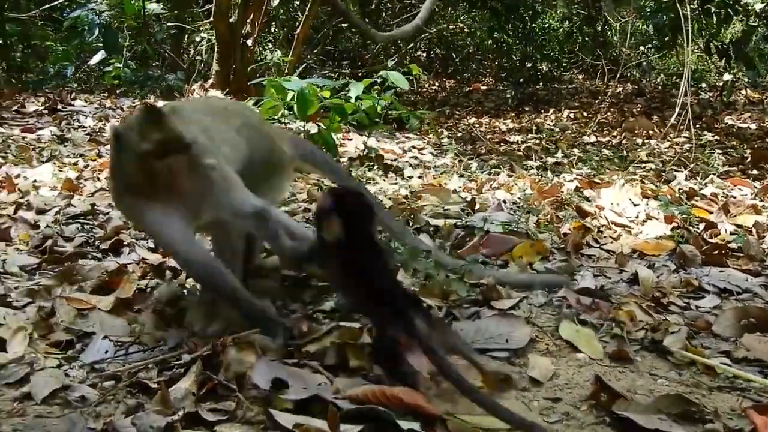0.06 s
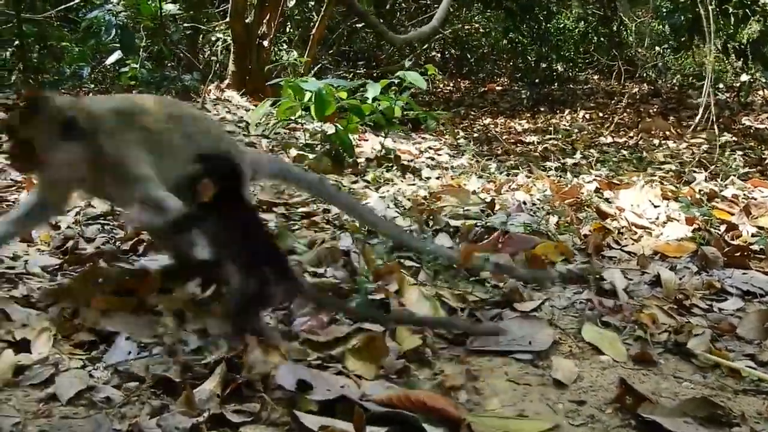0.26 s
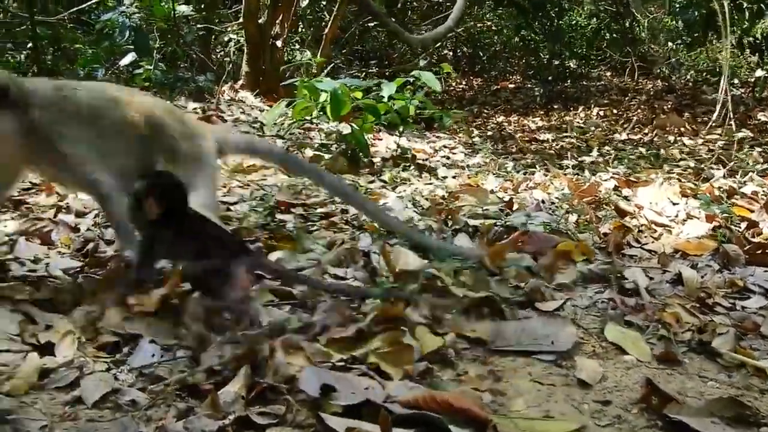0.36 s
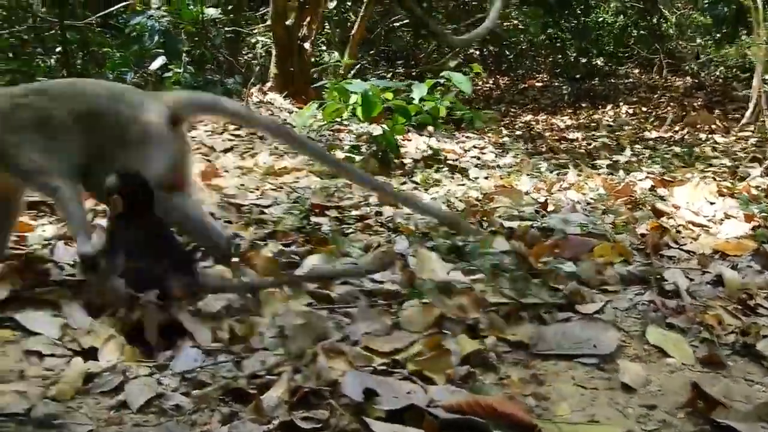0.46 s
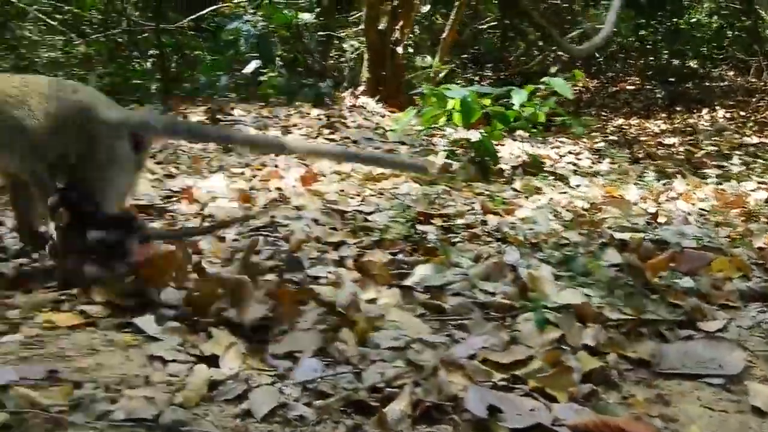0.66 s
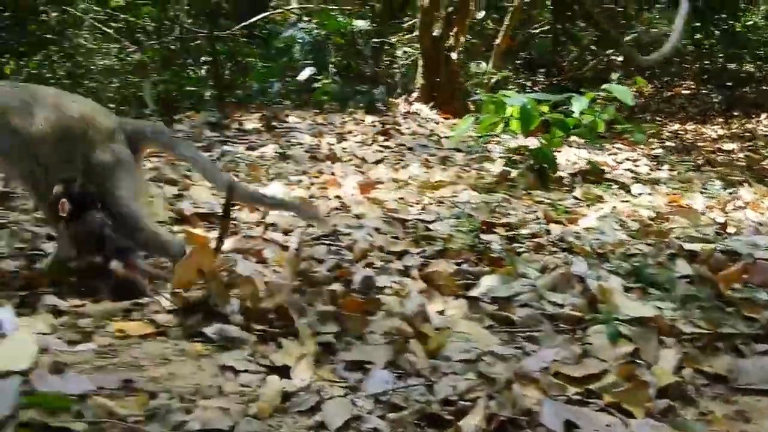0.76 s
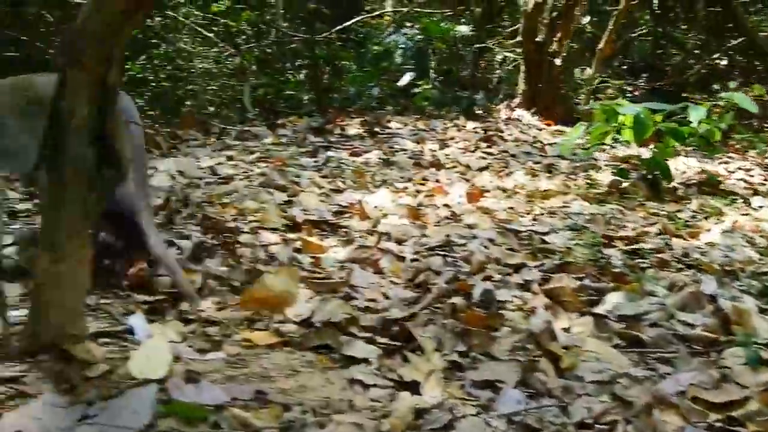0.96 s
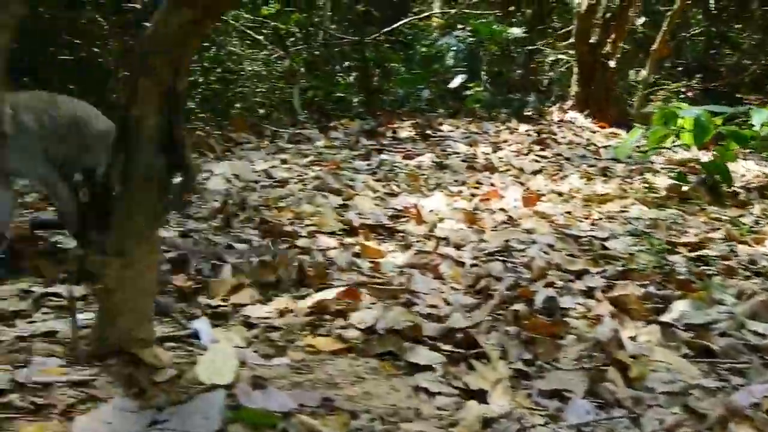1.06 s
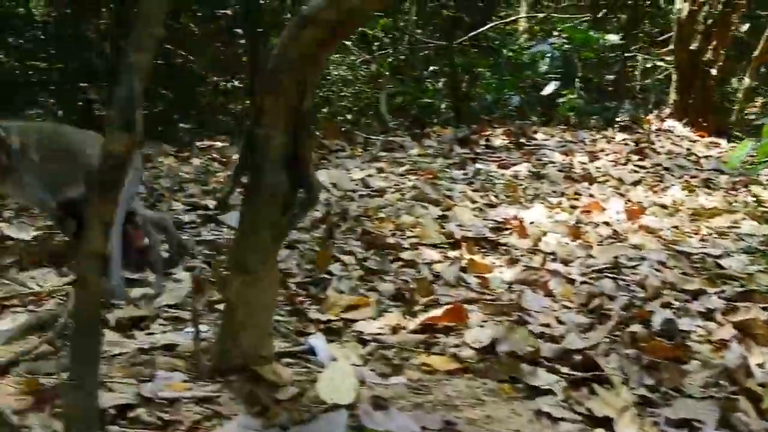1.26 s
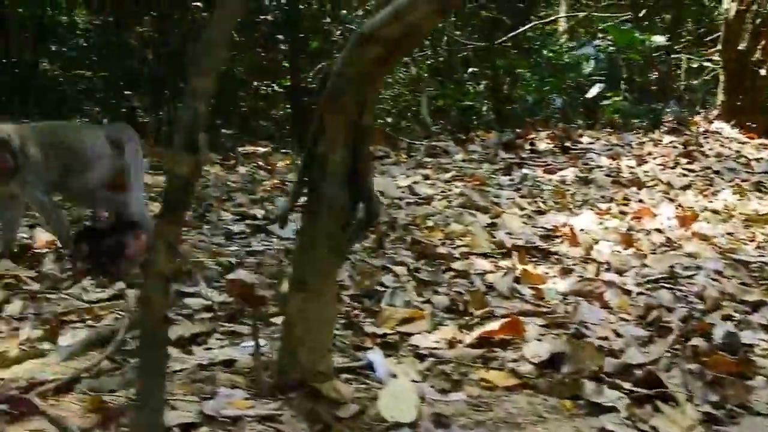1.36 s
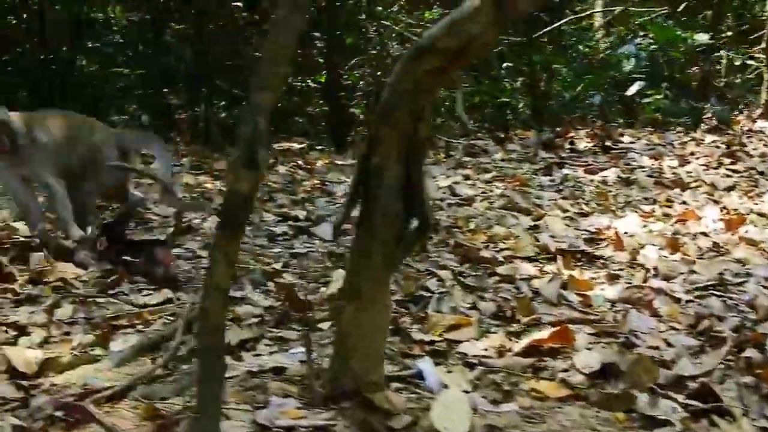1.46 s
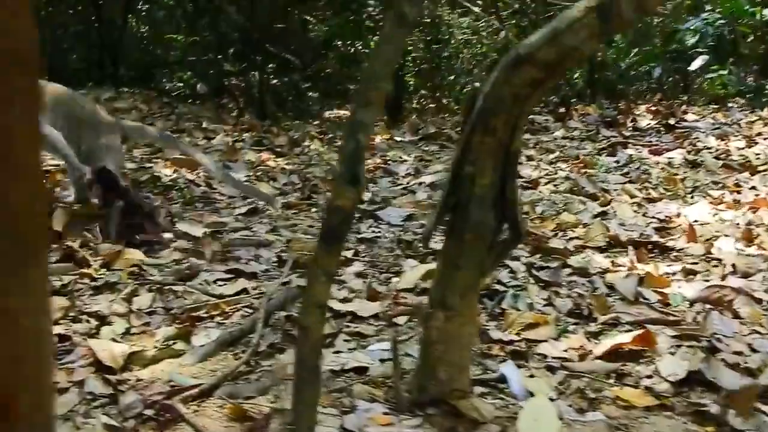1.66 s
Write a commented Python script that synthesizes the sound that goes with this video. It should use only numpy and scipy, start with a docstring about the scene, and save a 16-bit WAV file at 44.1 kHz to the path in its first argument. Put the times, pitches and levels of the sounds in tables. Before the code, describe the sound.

A baby monkey gives four short, shrill, raspy squeals with faint whimpers between, close and slightly left. Monkey feet crunch through dry leaves throughout, over soft forest hiss, faint insects and a low distant rumble.

```python
"""Baby monkey on the forest floor

Close by, a little left of a stereo pair, a baby monkey squeals four times, whimpering faintly between,
as it clings to an adult walking off over dry leaves. Each squeal is a gliding whistle, modulated by a
second, lower oscillator and torn by rasp. Behind the crunching feet lie a low distant rumble, forest
hiss and faint insects; the recorder's gain control ducks after the loud squeals."""
import sys
import numpy as np
from scipy import signal
from scipy.fft import rfft, irfft
from scipy.io import wavfile
from scipy.ndimage import uniform_filter1d

SR = 44100
rng = np.random.default_rng(int(sys.argv[2]) if len(sys.argv) > 2 else 0)


def transcribe(u):
    """Save the signal u as a 16-bit wav file named by the first command-line argument.

    u: samples, shape (n,) or (channels, n), limited to [-1, 1]; the rate is SR.
    q: integer samples, one column per channel.
    """
    v = np.clip(np.atleast_2d(u).T, -1, 1)
    q = np.round(v * 32767).astype(np.int16)
    wavfile.write(sys.argv[1], SR, q)


N = 74970
T = np.arange(N) / SR
HZ = np.fft.rfftfreq(N, 1 / SR)


def amp(db):
    """Decibels to gain."""
    return 10 ** (np.asarray(db) / 20)


def unit(x):
    """Scales to rms 1."""
    return x / np.sqrt(np.mean(x ** 2) + 1e-20)


def curve(points):
    """Interpolates a table over log frequency onto the FFT bins."""
    f, value = np.transpose(points)
    return np.interp(np.log(HZ + 1), np.log(f), value)


def colour(x, spectrum):
    """Filters by a spectrum table; rms 1."""
    return unit(irfft(rfft(x) * amp(curve(spectrum)), N))


def wander(rate_hz):
    """Random motion up to about the given rate; rms 1."""
    return unit(irfft(rfft(rng.standard_normal(N)) / (1 + (HZ / rate_hz) ** 4), N))


def noise_band(phase, width_hz):
    """A band of noise centred on a tone."""
    return wander(width_hz) * np.sin(phase) + wander(width_hz) * np.cos(phase)


def mic_pair(x):
    """Blends two unrelated signals into left and right, least alike in the treble."""
    # likeness of the two microphones: f/Hz, coherence
    coherence = [(30, 0.7), (150, 0.97), (300, 0.91), (600, 0.74), (2000, 0.78), (8000, 0.45),
                 (15000, 0.27)]
    alike = np.clip(curve(coherence), 0, 1)
    mid, side = rfft(x) * np.sqrt([(1 + alike) / 2, (1 - alike) / 2])
    return irfft(np.array([mid + side, mid - side]), N)


def stereo_noise(spectrum):
    """Coloured noise at the two microphones; rms 1."""
    return colour(mic_pair(rng.standard_normal((2, N))), spectrum)


def distant_rumble():
    """Low noise from far off that swells and sinks."""
    # colour of the rumble: f/Hz, relative density/dB
    spectrum = [(20, -43), (50, -25.5), (80, -3.5), (125, -14), (160, 2.5), (205, -1), (245, 0), (310, -9),
                (380, -17), (700, -24.5), (2000, -64)]
    # swell of the rumble: t/s, level/dB
    swell = [(0, -30.5), (.065, -32), (.11, -35), (.23, -33), (.39, -37), (.47, -31.5), (.8, -35),
             (.89, -32.5), (.95, -36.5), (1.015, -33), (1.1, -35.5), (1.3, -37.5), (1.55, -37), (1.7, -35)]
    return amp(np.interp(T, *np.transpose(swell))) * stereo_noise(spectrum)


def forest_air(level_db=-34.5, flicker_db=1.5):
    """A broad hiss all around, its level flickering slightly."""
    # colour of the forest air: f/Hz, relative density/dB
    spectrum = [(200, -10.5), (450, -2.5), (800, -1), (1500, -5.5), (2800, -7.5), (4500, -4.5), (9000, -6),
                (16000, -25)]
    return amp(level_db + flicker_db * wander(20)) * stereo_noise(spectrum)


def insects():
    """Far insects hold thin, narrow-band drones in the centre of the image."""
    # drones: f/Hz, width/Hz, level/dB
    drones = [(1774, 57, -53), (3460, 88, -49.5), (3607, 33, -56)]
    return sum(amp(db) * noise_band(2 * np.pi * hz * T, width) for hz, width, db in drones)


def leaf_litter(floor_db=-43, cracks_per_s=4000, spread_db=-.5, snap_decay_s=.0013):
    """Dry leaves underfoot: dense tiny cracks that swell with each step, and a few sharp snaps."""
    # scuffs of the feet: peak t/s, rise/s, decay/s, level/dB
    steps = [(.01, 0.013, 0.15, -30), (0.171, .04, 0.14, -29.5), (0.218, 0.019, 0.032, -28),
             (.458, 0.07, 0.052, -22), (.65, 0.085, 0.098, -22.5), (.8, 0.033, .03, -42.5),
             (.9, .02, 0.032, -32.5), (1.12, 0.084, 0.13, -25), (1.335, 0.027, 0.029, -31),
             (1.387, 0.0053, 0.062, -27), (1.436, 0.018, 0.013, -25.5), (1.535, 0.019, 0.12, -32.5),
             (1.68, 0.085, 0.036, -34)]
    # single leaves snapping: t/s, level/dB
    snaps = [(.067, -19), (0.2042, -25), (0.2207, -15.5), (.686, -9.5), (1.44, -21), (1.529, -29)]
    # colour of dry leaves: f/Hz, relative density/dB
    spectrum = [(150, -3), (600, -6), (1450, -2), (1750, 1), (2100, -3.5), (2800, -3), (3450, -0.5),
                (4100, -2), (5500, 2), (7200, 1), (9200, 9.5), (11000, -7.5), (13500, -9.5), (16000, -14.5)]
    sizes = amp(spread_db * np.minimum(rng.exponential(1, (2, N)), 4))
    cracks = rng.standard_normal((2, N)) * sizes * (rng.random((2, N)) < cracks_per_s / SR)
    power = amp(floor_db) ** 2
    for at, rise, decay, db in steps:
        scuff = amp(db) * np.exp(-np.maximum((at - T) / rise, (T - at) / decay))
        power = power + scuff ** 2
    crunch = colour(mic_pair(cracks), spectrum) * np.sqrt(power)
    snap_envelope = sum(amp(db) * (T >= at) * np.exp(-abs(T - at) / snap_decay_s) for at, db in snaps)
    return crunch + snap_envelope * stereo_noise(spectrum)


def whistle(phase, hz, level_db, sidebands_db, flutter_hz, lower_hz=3900):
    """The tone of a cry: a second, lower oscillator modulates it and puts sidebands around it."""
    lower = 2 * np.pi * np.cumsum(lower_hz * (1 + .012 * wander(flutter_hz))) / SR
    sidebands = amp(sidebands_db) @ np.sin([phase - lower, phase + lower, phase - 2 * lower])
    # the sidebands fade faster than the whistle itself
    depth = amp(.2 * (level_db - level_db.max())) * (1 + .083 * wander(flutter_hz))
    # an overtone grows as the pitch drops below 6 kHz
    octave = amp(5) * np.clip((6000 - hz) / 3400, 0, 1) * np.sin(2 * phase)
    shimmer = 1 + .28 * wander(flutter_hz)
    tone = np.sqrt(2) * (np.sin(phase) + octave + sidebands * depth) * shimmer
    # trims the deep thump as the lowest sideband sweeps down toward 0 Hz
    bass_rolloff = signal.butter(1, 35, "high", fs=SR)
    return amp(level_db) * signal.lfilter(*bass_rolloff, tone)


def rasp(phase, skirt_db):
    """The noise of a cry, in bursts: broad hiss and a skirt that clings to the whistle; rms 1."""
    # colour of the rasp: f/Hz, relative density/dB
    spectrum = [(200, -7.5), (900, -9), (2500, -6), (4000, -5.5), (5400, 2), (7200, -0.5), (9300, 3),
                (11200, -7.5), (13800, -10), (16000, -7)]
    skirt = amp(skirt_db) * noise_band(phase, width_hz=900)
    noise = stereo_noise(spectrum) + skirt
    return unit(noise * (1 + .3 * wander(rate_hz=200)))


def baby_monkey(edge_s=.002, flutter_hz=400):
    """Squeals and whimpers: each a jittery, gliding whistle with rasp that opens and closes abruptly."""
    # cries: jitter/share of pitch, skirt/dB, sidebands (below, above, far below)/dB,
    # left minus right/dB, course [t/s, pitch/Hz, whistle/dB, rasp/dB]
    cries = [ (.011, -6, (-10.5, -15, -16.5), -.3, [(.2425, 9870, 4.5, -8), (.245, 9590, -4.5, -12),
             (.251, 9416, -5, -14.5), (.261, 9350, -3.5, -11), (.27, 8830, -3, -6), (.275, 8300, -9, -17),
             (.279, 7930, -3, -16), (.286, 7850, -4, -16), (.29, 7850, -13, -19), (.302, 7780, -24, -19)]),
             (0.0164, -14, (-24, -22, -30), 0, [(.303, 7420, -26, -15.5), (.317, 6620, -16.5, -25),
             (.333, 5280, -32.5, -19), (.36, 5020, -26, -25), (.374, 4700, -31, -17.5),
             (.388, 4260, -26, -28)]), (0.0192, -9, (-29, -24, -28), 0, [(.38, 3700, -44.5, -42),
             (.398, 3170, -31, -26), (.408, 3030, -43, -32)]), (0.012, -9, (-29, -24, -28),
             0.34, [(.548, 2392, -49, -35), (.569, 3050, -36, -18.5), (.575, 3497, -21.5, -36),
             (.587, 3440, -31.5, -14.5), (.612, 3380, -38, -43)]), (.019, -1, (-15, -14, -28),
             1.2, [(.573, 8300, -25, -17), (.578, 8650, -10, -13), (.585, 10120, -18, -12.5),
             (.599, 10660, -12.5, -16), (.614, 9850, -18, -16.5), (.643, 9340, -29, -14),
             (.668, 8890, -41, -19), (.69, 8730, -44, -23), (.706, 8040, -40, -25)]),
             (0.019, 5, (-9.5, -20, -17), -1.8, [(.708, 7980, -23, -33.5), (.716, 7570, -19, -24),
             (.721, 7370, -32, -18.5), (.729, 8020, -26, -46), (.736, 7570, -32, -35)]),
             (0.0227, 3, (-25, -27, -28), -0.56, [(.737, 4450, -39, -27), (.749, 4240, -34, -32),
             (.757, 3800, -29, -32.5), (.773, 3570, -47, -37)]), (0.0898, -28, (-8, -15, -30),
             -0.56, [(1.01, 2430, -48, -33.5), (1.021, 2776, -32, -23), (1.028, 2728, -26, -25),
             (1.036, 2770, -19, -13)]), (.007, -6, (-15, -19, -20), 2, [(1.027, 8400, -16, -23),
             (1.03, 8750, -1, -15), (1.034, 9000, 1, -11), (1.038, 9380, 4, -8), (1.046, 9200, 8, -14),
             (1.051, 8950, -2.5, -3.5), (1.062, 8460, -12.5, -15), (1.076, 8050, -9.5, -16),
             (1.092, 8430, -21, -25), (1.125, 8100, -30, -27)]), (0.0102, 2, (-11.5, -16, -18),
             -1.4, [(1.571, 7394, -24.5, -38), (1.575, 7570, -22, -33), (1.582, 7775, -23, -31),
             (1.585, 8304, -18.5, -34), (1.598, 8536, -18.5, -24), (1.605, 8220, -26, -23),
             (1.611, 7780, -23, -37), (1.618, 7800, -23, -40), (1.632, 7540, -30, -32)]), ]
    out = np.zeros((2, N))
    for jitter, skirt_db, sidebands_db, balance_db, course in cries:
        times, *tracks = np.transpose(course)
        pitch, whistle_db, rasp_db = (np.interp(T, times, track) for track in tracks)
        hz = pitch * (1 + jitter * wander(flutter_hz))
        phase = 2 * np.pi * np.cumsum(hz) / SR
        tone = whistle(phase, hz, whistle_db, sidebands_db, flutter_hz)
        voice = tone + amp(rasp_db) * rasp(phase, skirt_db)
        gate = np.clip(np.minimum(T - times[0], times[-1] - T) / edge_s + .5, 0, 1)
        out += gate * voice * amp([[balance_db / 2], [-balance_db / 2]])
    return out


def echoes(x, decay_s):
    """Sparse reflections that die away, different at each microphone."""
    taps = rng.choice([-1., 1.], (2, N)) * (rng.random((2, N)) < .1)
    taps *= np.exp(-T / decay_s) * (T > .0005)
    taps /= np.linalg.norm(taps, axis=1, keepdims=True) + 1e-12
    return signal.fftconvolve(x, taps, axes=1)[:, :N]


def scene(forest_t60_s=.35):
    """Monkeys near and slightly left, echoing off ground and trees, with the forest behind."""
    # lead of the left microphone: f/Hz, phase/rad
    left_lead = [(200, .02), (4000, 0.87), (9000, 1.0), (13000, 1)]
    near = baby_monkey() + leaf_litter()
    near = irfft(rfft(near) * np.exp(-1j * np.outer([0, 1], curve(left_lead))), N)
    ground = amp(-4) * echoes(near, decay_s=.0055)
    trees = amp(-19) * echoes(near, decay_s=forest_t60_s / np.log(1000))
    return near + ground + trees + distant_rumble() + forest_air() + insects()


def record(dry, limit_db=-8, recover_db_per_s=13, cutoff_hz=15750):
    """The recorder: gain control clamps loud squeals and recovers slowly; then clipping and low-pass."""
    power_db = 10 * np.log10(abs(uniform_filter1d((dry ** 2).mean(0), size=180)) + 1e-12)
    recovery = T * recover_db_per_s
    held_db = np.maximum.accumulate(power_db + recovery) - recovery
    duck_db = uniform_filter1d(np.maximum(held_db - limit_db, 0), size=60)
    limited = np.clip(dry * amp(-duck_db), -1, 1)
    lowpass = signal.firwin(511, cutoff_hz, window=("kaiser", 9), fs=SR)
    return signal.oaconvolve(limited, lowpass[None], "same")


dry = scene()
out = record(dry)
transcribe(out)
```